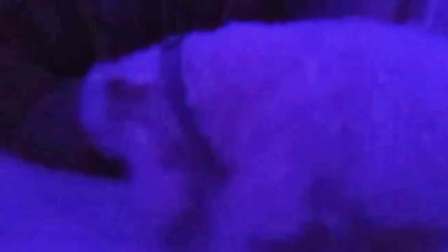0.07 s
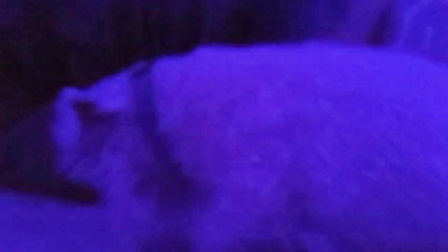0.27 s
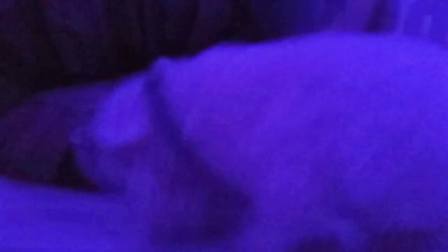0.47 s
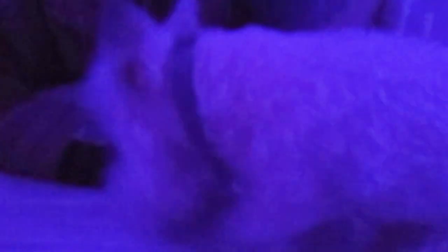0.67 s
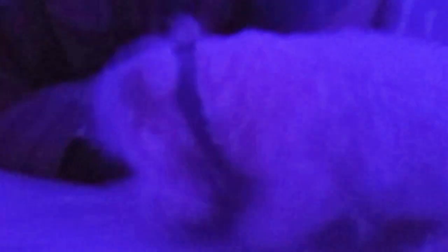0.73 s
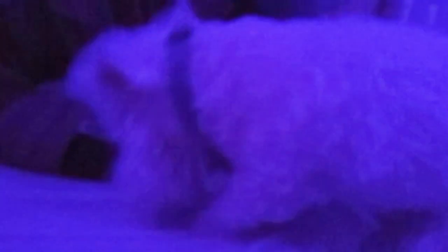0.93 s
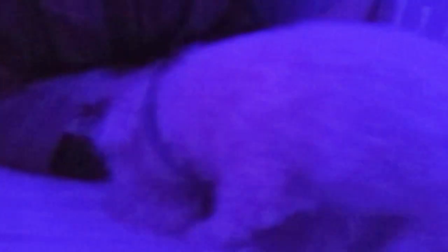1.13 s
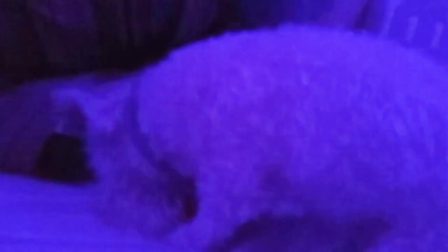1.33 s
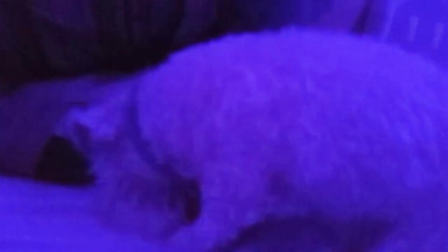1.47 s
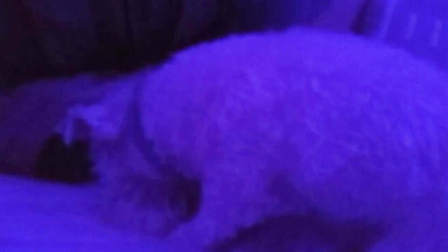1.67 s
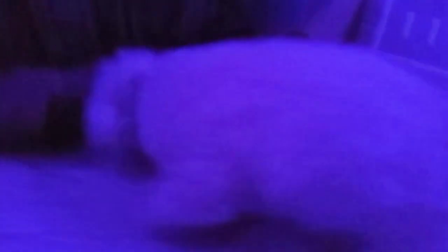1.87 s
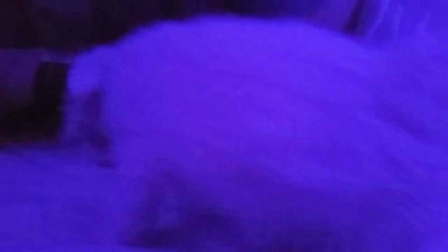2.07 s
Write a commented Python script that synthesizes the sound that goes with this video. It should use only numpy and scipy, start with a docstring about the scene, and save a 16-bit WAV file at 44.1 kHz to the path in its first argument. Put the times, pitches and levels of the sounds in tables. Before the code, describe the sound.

A small dog scratches at soft bedding, close by in a quiet room. Quick, hissing scrapes run from the start to about 0.9 seconds, strongest from 0.3 to 0.8, with snapping claw snags and dull mattress bumps over a low rumble. The collar's metal fittings clink lightly around 1 second, followed by a lull. From 1.6 to 2.1 seconds, a few softer scrapes return with faint clinks.

```python
"""Quick, hissing scrapes open the scene: a small dog digs at soft bedding, close by in a quiet room.
Each paw stroke drags over the weave, and stick-slip friction sounds the padding, cloth and fur.
Claws tick, snag and snap free, or zip over the threads, while the mattress bumps and heaves below.
Now and then the metal fittings of the collar strike each other and ring in their natural modes."""
import sys
import numpy as np
from scipy import signal
from scipy.fft import rfft, irfft
from scipy.io import wavfile
from scipy.ndimage import uniform_filter1d

SR = 44100
rng = np.random.default_rng(int(sys.argv[2]) if len(sys.argv) > 2 else 0)


def transcribe(signal):
    """Save signal, clipped to [-1, 1], as a 16-bit WAV file at the path in sys.argv[1]."""
    frames = np.atleast_2d(signal).T
    limited = np.clip(frames, -1, 1)
    pcm = np.round(limited * 32767).astype(np.int16)
    wavfile.write(sys.argv[1], SR, pcm)


N = 92610

# Spectrum of the nap's hiss and of the ticks: multiple_of_centre, density_db
HISS_SPECTRUM = [(.5, -18.5), (.7, -16), (.86, -5), (.96, 0.5), (1.03, 1.5), (1.12, -4), (1.22, -9),
                 (1.4, -13)]


def undb(db):
    """Decibels to amplitude ratio."""
    return 10 ** (np.asarray(db) / 20)


def since(start):
    """Seconds since start, zero before it."""
    return np.maximum(np.arange(N) / SR - start, 0)


def colour(x, points):
    """Spectral shaping by (frequency_hz, gain_db) points, with 30 dB per octave skirts; rms 1."""
    hz, db = np.array(points, float).T
    octave, knots = np.log2(np.maximum(np.fft.rfftfreq(N, 1 / SR), 1)), np.log2(hz)
    skirt_db = 30 * abs(octave - np.clip(octave, knots[0], knots[-1]))
    y = irfft(rfft(x) * undb(np.interp(octave, knots, db) - skirt_db), N)
    return y / y.std()


def wander(hz):
    """Random modulation: straight lines join hz random values a second; spread 1."""
    span = max(int(SR / hz), 1)
    y = uniform_filter1d(np.repeat(rng.standard_normal(N // span + 1), span), span)[:N]
    return y / y.std()


def steady(x, samples):
    """Division by the running rms holds a noise at a steady level."""
    power = uniform_filter1d(uniform_filter1d(x ** 2, samples), samples)
    return x / np.sqrt(power + 1e-12)


def slips(per_s, spread_db):
    """Stick-slip friction: fibres let go in random impulses, a few much larger than the rest."""
    size = undb(spread_db * np.minimum(rng.exponential(size=N), 5))
    return (rng.random(N) < per_s / SR) * size * rng.choice([-1, 1], N)


def paw_strokes():
    """Friction noise: as a paw presses, drags and lifts, slips excite padding, cloth, fur and nap."""
    # start_s, rise_s, hold_s, fall_s, thud_db, rasp_db, swish_db, hiss_db, hiss_hz, fold_hz
    strokes = [(-.004, .003, 0.016, 0.012, -47.5, -35.5, -45, -28.5, 11050, 1040),
               (0.034, 0.025, .012, .065, -52, -58, -62, -43, 11100, 550),
               (0.174, 0.017, .015, .11, -47.5, -51.5, -77, -44, 11300, 1770),
               (0.257, 0.027, .016, 0.025, -33.5, -34, -49, -35, 11000, 1520),
               (0.315, 0.022, 0.0085, 0.0083, -29, -38, -42, -33.5, 12500, 1370),
               (0.344, 0.018, 0.029, 0.076, -43, -40, -45.5, -33, 12200, 1710),
               (0.403, .025, 0.016, 0.022, -31, -39, -42.5, -27, 12540, 520),
               (0.506, 0.028, .012, 0.032, -59, -38, -38, -32.5, 11200, 1460),
               (0.543, 0.041, .026, 0.0093, -33, -32.5, -40.5, -26, 11200, 1640),
               (0.605, 0.01, 0.014, 0.041, -41.5, -44.5, -42, -31, 11060, 2200),
               (0.653, 0.029, .012, 0.013, -44.5, -35.5, -48, -42.5, 10300, 660),
               (0.697, 0.015, 0.025, 0.01, -47, -36, -52, -43, 11400, 1820),
               (0.732, 0.014, 0.014, 0.013, -32, -35.5, -42, -30.5, 12750, 505),
               (0.769, 0.02, 0.067, 0.069, -49, -50, -48.5, -46, 11300, 7000),
               (0.896, 0.0078, 0.0058, 0.033, -51, -50, -57.5, -50, 12500, 1450),
               (1.598, 0.035, 0.027, 0.046, -50, -47, -49.5, -38.5, 11200, 1300),
               (1.689, 0.067, 0.031, 0.019, -50.5, -42, -35.5, -28, 11300, 5200),
               (1.799, 0.048, 0.029, 0.099, -56.5, -57, -56.5, -43.5, 12000, 6470),
               (1.963, 0.042, 0.011, 0.024, -46, -47.5, -51, -38, 11250, 870),
               (2.033, 0.031, 0.028, .051, -47, -59, -50, -43, 11200, 1700)]
    # Spectra of the padding, taut cloth and sliding fur: frequency_hz, density_db
    padding = [(50, -9), (85, -10.5), (125, 4), (190, -5.5), (300, -8), (480, -16.5), (900, -15)]
    cloth = [(250, -25), (420, -3.5), (530, 2.5), (670, -4.5), (820, -1.5), (1050, -3), (1700, -2.5),
             (2300, -3), (3200, -7), (4500, -11.5), (7000, -79)]
    fur = [(1700, -1.5), (3700, -6.5), (5300, -3), (6700, -3), (8200, 2), (10000, -4), (15000, -31)]
    thud = steady(colour(slips(per_s=700, spread_db=4.2), padding), samples=900)
    rasp = steady(colour(slips(per_s=1600, spread_db=1.64), cloth), samples=900)
    swish = steady(colour(slips(per_s=14000, spread_db=2.3), fur), samples=900)
    nap = slips(per_s=12000, spread_db=2.8)
    out = np.zeros(N)
    for start, rise, hold, fall, *levels_db, hiss_hz, fold_hz in strokes:
        press = np.minimum(since(start) / rise, 1) ** 1.2
        lift = np.exp(-since(start + rise + hold) / fall)
        hiss = colour(np.roll(nap, rng.integers(N)), np.array(HISS_SPECTRUM) * [hiss_hz, 1])
        layers = np.array([thud, cloth_fold(rasp, fold_hz), cloth_fold(swish, fold_hz), hiss])
        out += press * lift * (undb(levels_db) @ layers)
    judder_db = 0.84 * wander(hz=67)
    return out * undb(judder_db)


def cloth_fold(x, hz, boost_db=8.5, half_width_octaves=0.37):
    """Resonance: a fold of cloth under the paw favours one band; rms 1."""
    octaves = np.log2(np.maximum(np.fft.rfftfreq(N, 1 / SR), 1) / hz)
    y = irfft(rfft(x) * undb(boost_db / (1 + (octaves / half_width_octaves) ** 2)), N)
    return y / y.std()


def mattress_heave():
    """Elastic loading: the mattress rumbles under shifting weight, and once gives and recovers."""
    # Course of the rumble: time_s, level_db
    contour = [(0, -49), (.17, -71), (.28, -28.5), (.44, -26.5), (.5, -17), (.78, -28.5), (.93, -27.5),
               (1.04, -37), (1.22, -35.5), (1.5, -42.5), (1.65, -24), (1.82, -25.5), (1.96, -38.5)]
    # Its spectrum: frequency_hz, density_db
    spectrum = [(8, 3.5), (18, 12.5), (28, 6.5), (38, 2), (55, -9.5), (75, -19), (130, -80)]
    # The bedding gives under the dog: start_s, level_db, press_s, recovery_s
    shoves = [(0.193, -4, 0.034, 0.078)]
    level_db = np.interp(np.arange(N) / SR, *np.array(contour).T)
    out = undb(level_db) * steady(colour(rng.standard_normal(N), spectrum), samples=3500)
    for start, db, press, recovery in shoves:
        sink = np.sin(np.pi / 2 * np.minimum(since(start) / press, 1)) ** 2
        out += undb(db) * sink * np.exp(-since(start) / recovery)
    return out


def room_tone(noise_db=-48.5, hum_db=-63.5, hum_hz=350):
    """Stationary background: faint broadband noise and a pure-tone hum."""
    # Room noise: frequency_hz, density_db
    spectrum = [(45, 1.5), (120, 1.5), (190, -4), (290, -10), (400, -11.5), (770, -14.5), (1400, -17),
                (4000, -20.5), (8000, -18.5), (11200, -12.5), (13000, -18.5), (15700, -18.5)]
    noise = colour(rng.standard_normal(N), spectrum)
    hum = np.sqrt(2) * np.sin(2 * np.pi * hum_hz * since(0))
    return undb(noise_db) * noise + undb(hum_db) * hum


def dry_ticks(centre_hz=11570):
    """Brief impacts of claw tips and metal edges give fast-decaying bursts of treble noise."""
    # start_s, level_db, decay_s
    ticks = [(0.0105, -14, 0.0004), (1.032, -36, .003), (1.038, -36.5, 0.0069), (1.0492, -16, 0.00034),
             (1.2488, -33, 0.0054), (1.713, -33, 0.0054), (1.831, -29, 0.004)]
    bursts = sum(undb(db) * (since(start) > 0) * np.exp(-since(start) / decay)
                 for start, db, decay in ticks)
    return bursts * colour(rng.standard_normal(N), np.array(HISS_SPECTRUM) * [centre_hz, 1])


def damped_swings(events, rise_cycles):
    """Heavily damped oscillation: cloth or padding swings only once or twice."""
    out = np.zeros(N)
    for start, db, hz in events:
        cycles = since(start) * hz
        swell = cycles / rise_cycles
        out += undb(db) * (swell * np.exp(1 - swell)) ** 3 * np.sin(2 * np.pi * cycles)
    return out


def mattress_bumps():
    """Soft impacts set the padding into a low, damped vibration."""
    # start_s, peak_db, pitch_hz
    bumps = [(.063, -37.5, 237), (.297, -20, 115.5), (.336, -22, 135), (.444, -23.5, 111), (.582, -30, 194),
             (.7385, -21, 200.5), (1.24, -28, 49), (2.003, -35, 134)]
    return damped_swings(bumps, rise_cycles=0.82)


def claw_snags():
    """Plucking: a thread under tension snaps free of a claw."""
    # start_s, peak_db, pitch_hz
    snags = [(.2675, -27, 1800), (.2835, -22, 1680), (.2925, -11, 1900), (.3012, -7, 1780),
             (.3185, -19.5, 2260), (.3322, -16.5, 1370), (.3385, -19, 1570), (.3678, -10.5, 1720),
             (.4158, -19.5, 640), (.5295, -21, 1770), (.5755, -22.5, 1500), (.597, -25, 2270),
             (.6072, -13.5, 1210), (.611, -12, 1770), (.7135, -9.5, 1820)]
    return damped_swings(snags, rise_cycles=0.66)


def collar_clinks(sag_per_s=10.2, detune=0.002, chatter_rad=0.55, tail_db=-21, tail_stretch=3.6):
    """Modal vibration: buckle and ring touch and chatter; fur damps them to a faint, uneven tail."""
    # Modes of the metal: pitch_hz, level_db, t60_s, part (0 buckle, 1 ring)
    modes = [(6080, -22, 0.051, 0), (12100, -18, .025, 0), (13420, -4, 0.012, 0), (14510, 2, 0.021, 0),
             (14460, -6.5, 0.043, 0), (11620, 4.5, 0.05, 1), (12040, -11.5, 0.059, 1)]
    # start_s, buckle_db, ring_db, contact_s
    clinks = [(0.313, -35, -32, 0.00042), (0.528, -26, -44, 0.00042), (0.7165, -23, -25.5, 0.00035),
              (.725, -38, -21, .0005), (1.0082, -14.5, -41, 0.0015), (1.024, -24.5, -41, 0.00082),
              (1.049, -11, -52, 0.00038), (1.0643, -24, -49, 0.00087), (1.711, -46, -28, .0005),
              (1.832, -22, -33, .0003), (1.84, -23, -33, 0.00057), (1.859, -34, -43, 0.00065),
              (2.069, -37, -42, .0005)]
    chatters = [wander(hz=456) for _ in modes]
    out = np.zeros(N)
    for start, *part_db, contact in clinks:
        t = since(start)
        onset = 1 - np.exp(-t / contact)
        for (hz, db, t60, part), chatter in zip(modes, chatters):
            # A longer contact loads the metal and lowers its pitch.
            pitch = hz * (1 - sag_per_s * contact + detune * rng.standard_normal())
            decay = np.log(1000) * t / t60
            fade = np.exp(-decay) + undb(tail_db) * chatter * np.exp(-decay / tail_stretch)
            tone = np.sin(2 * np.pi * pitch * t + chatter_rad * chatter)
            out += undb(db + part_db[round(part)]) * onset * fade * tone
    return out


def claw_zips(end_slowing=0.24, waver=0.0482, roughness_db=2.5):
    """Periodic excitation: a claw speeds up and slows over the weave's ribs, so its pitch arches."""
    # start_s, length_s, top_pitch_hz, level_db
    zips = [(0.39, 0.011, 1900, -31), (.401, 0.021, 1813, -26), (0.419, 0.0063, 1676, -30),
            (1.974, 0.0354, 1567, -44)]
    out = np.zeros(N)
    for start, length, hz, db in zips:
        swell = np.sin(np.pi * np.minimum(since(start) / length, 1))
        speed = 1 - end_slowing * (1 - swell ** 2)
        cycles = np.cumsum(hz * speed * (1 + waver * wander(hz=900))) / SR
        out += undb(db + roughness_db * wander(hz=600)) * swell * np.sin(2 * np.pi * cycles)
    return out


def scene():
    """Superposition: the sounds of dog, bedding and room add in one channel."""
    return (paw_strokes() + mattress_heave() + room_tone() + dry_ticks()
            + mattress_bumps() + claw_snags() + collar_clinks() + claw_zips())[None]


def record(dry, cutoff_hz=15750):
    """Band limiting: a steep elliptic low-pass removes the highest treble."""
    return signal.sosfilt(signal.ellip(10, .2, 70, cutoff_hz, fs=SR, output="sos"), dry)


dry = scene()
out = record(dry)
transcribe(out)
```